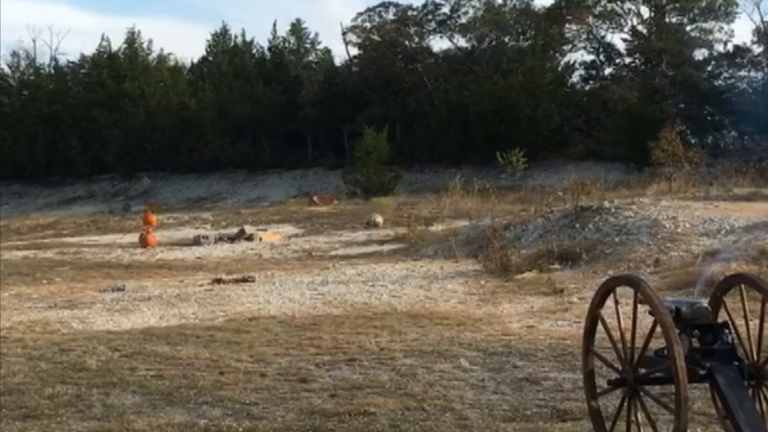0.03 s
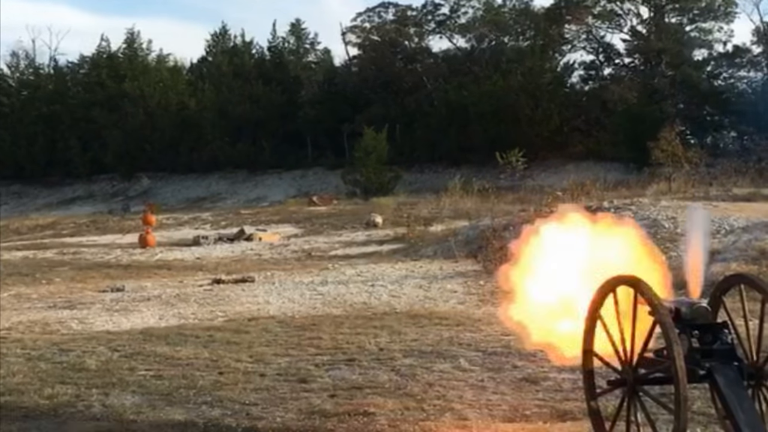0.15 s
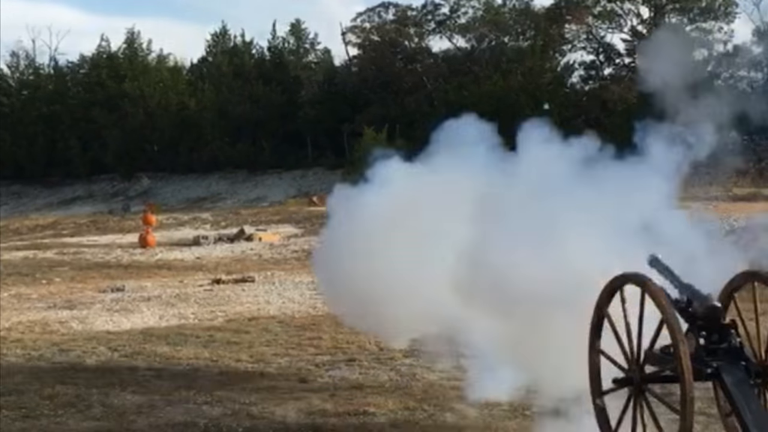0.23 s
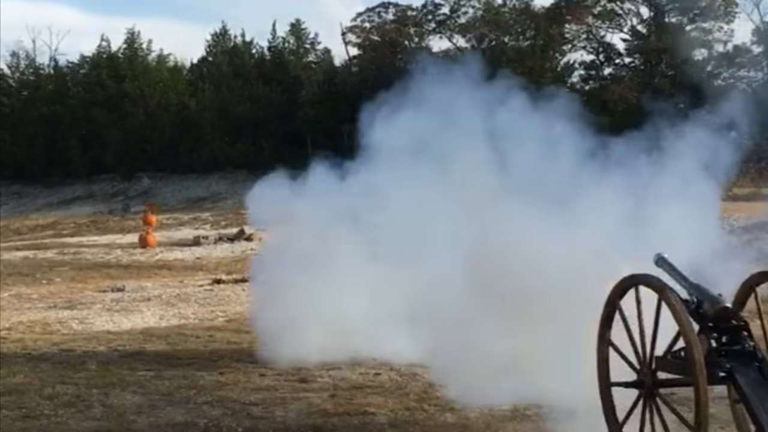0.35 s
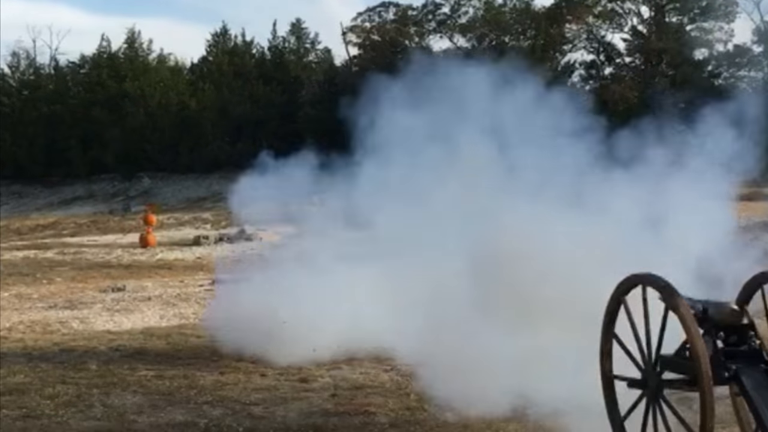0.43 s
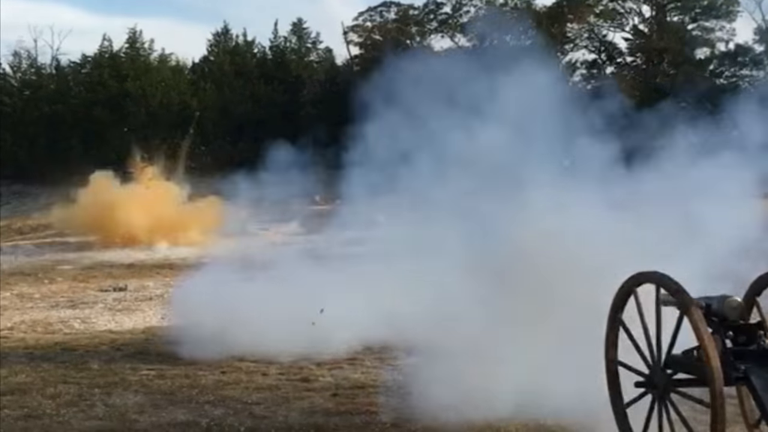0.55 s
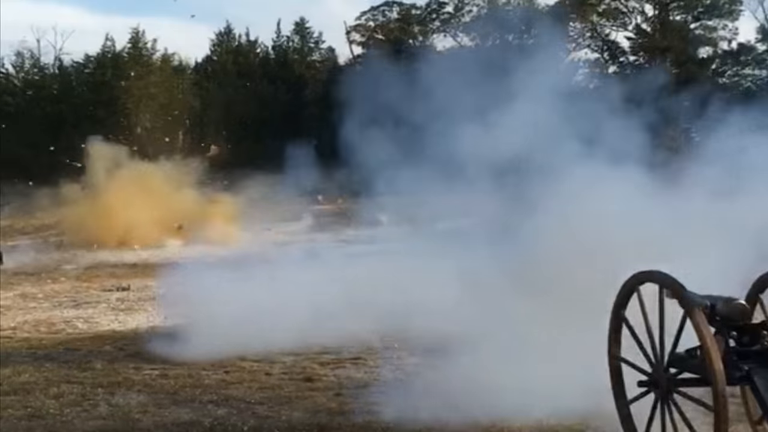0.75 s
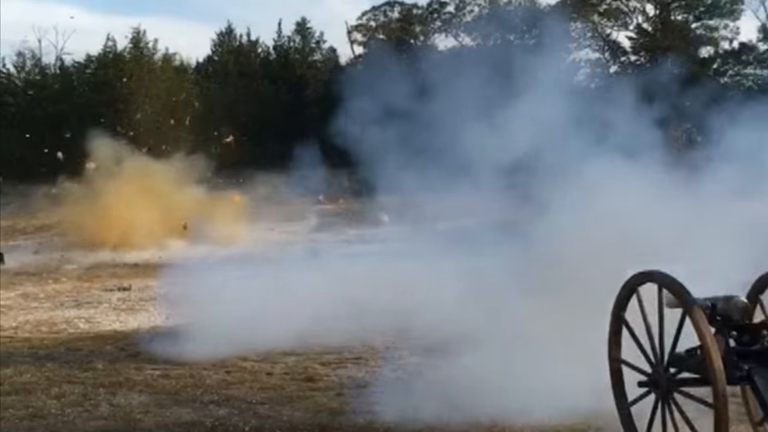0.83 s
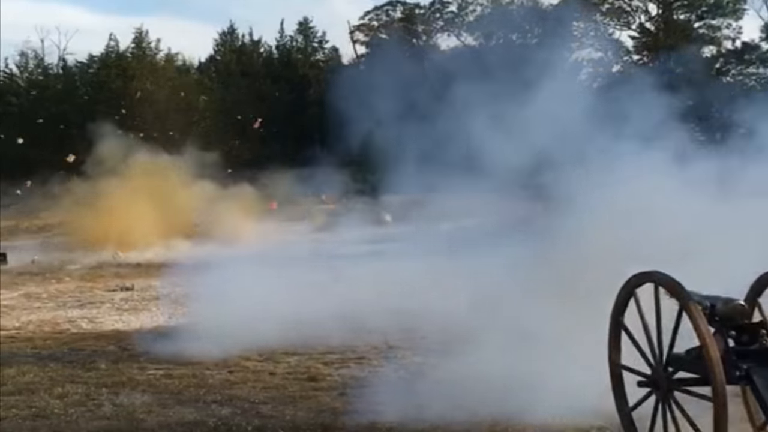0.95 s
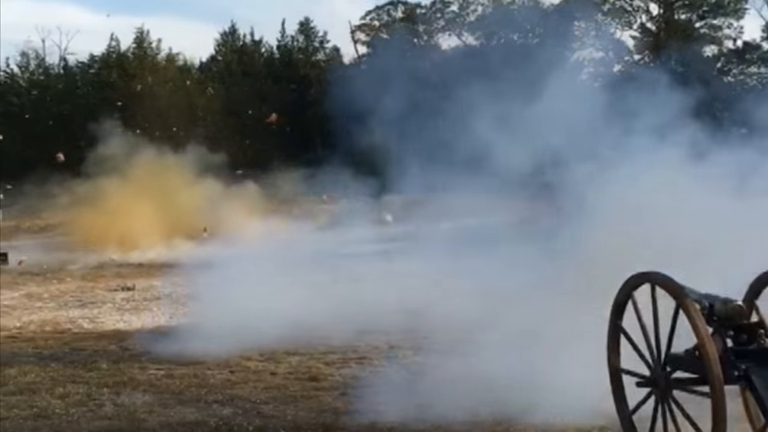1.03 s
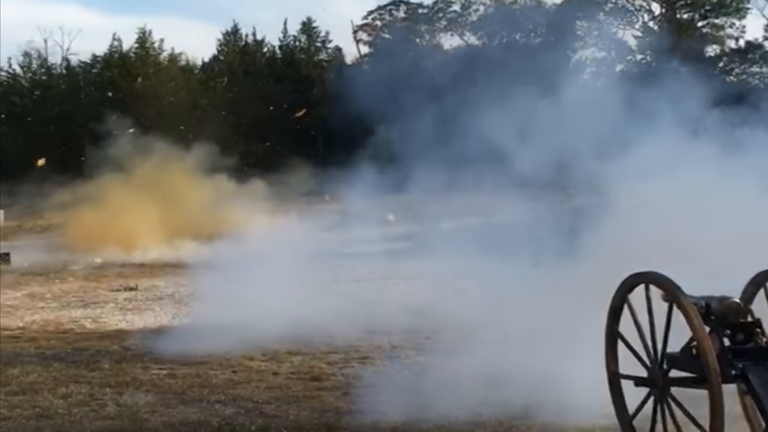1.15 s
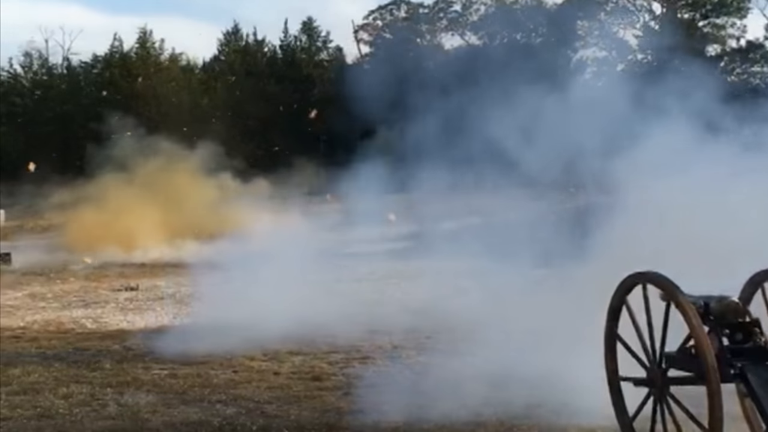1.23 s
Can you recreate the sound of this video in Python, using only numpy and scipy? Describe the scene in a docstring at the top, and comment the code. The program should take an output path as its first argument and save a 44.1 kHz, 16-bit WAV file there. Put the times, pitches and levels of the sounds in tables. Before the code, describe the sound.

A cannon goes off close by after a tiny priming spit, a hard crackling boom with a gas rasp, then a cluster of loud bursts downrange and rolling echo from the woods, overloading the outdoor microphone.

```python
"""A muzzle-loading cannon fires across an open field edged with trees.
Priming spits (shaped noise), then the muzzle blasts: N-shaped fronts with crackle, roaring noise, a deep sine boom.
Gas rasps on as the roar dies; a soft recoil knock follows, then more bursts as the shot strikes downrange.
Woods and land return a long, dulling noise echo and a low rumble, over light wind and faint hiss.
The microphone overloads; a limiter holds the peaks down."""
import sys
import numpy as np
from scipy import signal
from scipy.io import wavfile
from scipy.ndimage import uniform_filter1d, minimum_filter1d

SR = 44100
rng = np.random.default_rng(int(sys.argv[2]) if len(sys.argv) > 2 else 0)


def int16_out(signal):
    """Quantize to a 16-bit WAV file."""
    q = np.round(np.clip(np.atleast_2d(signal).T, -1, 1) * 32767)
    wavfile.write(sys.argv[1], SR, q.astype(np.int16))


N = 57330
TIME_S = np.arange(N) / SR

# Spectrum tables give relative density; noise() sets the total power.
# shock fronts and reflections: onset t/s, front level/dB, front length/s,
# crackle level/dB, crackle hold/s, crackle top f/Hz
SHOCK_FRONTS = [(0.2441, -14, 0.0022, 2, 0.002, 17300), (.2500, -14, 0.0004, -11, 0.0067, 16100),
                (0.2568, -1, .0035, -22, 0.0016, 5000), (0.5267, -1, 0.000814, -9.5, 0.00067, 16000),
                (.5295, -13.5, 0.0024, -21.5, 0.0035, 8000), (0.5336, -4, 0.00073, -30, 0.0012, 9000),
                (0.5765, 0, 0.00115, -7, 0.002, 13700), (0.6048, -3, 0.0011, -13.5, 0.0028, 16000),
                (.6100, -9, 0.0014, -31, 0.0014, 4000), (0.6213, -18, 0.00072, -17.5, .004, 3600),
                (0.6744, -28, 0.00023, -7, 0.0036, 10400), (.6820, -17, 0.00074, -9, 0.00095, 14800),
                (0.7053, 4.5, 0.00262, -5.5, .002, 4000), (0.7106, -7, 0.003, -19, 0.0004, 11100)]
# crackle spectrum: f/Hz, level/dB per Hz
CRACKLE_SPECTRUM = [(100, -1), (700, 14.5), (2000, 3.5), (4000, 3.5), (8000, -2.5), (12000, -3.5),
                    (16000, -6.5)]
# brief ring of the fronts: f/Hz, width/Hz, level/dB
FRONT_RINGS = [(417, 60, -18), (970, 140, -2)]
# pressure swings of the big blasts and strongest returns: onset t/s, level/dB, f/Hz, hold/s, fall/(dB/s)
BOOM_SWINGS = [(.251, -10.5, 64, 0.05, 492), (0.573, -9, 69.5, 0.035, 901), (.678, -5, 66.9, 0.052, 323),
               (.703, -9, 141.8, 0.021, 450), (0.791, -9, 104, 0.0096, 900), (0.817, -19, 66, 0.04, 400)]
# roar of each blast and burst: onset t/s, level/dB, hold/s, fall/(dB/s), brightness/(dB/octave)
ROAR_EVENTS = [(0.239, -13.5, 0.043, 420, .8), (0.52, -20.5, 0.025, 396, 0.15),
               (0.574, -13.5, 0.015, 520, 0), (0.5988, -13.5, 0.024, 476.5, 0.53),
               (0.672, -11.5, 0.057, 286, -1.0)]
# roar spectrum: f/Hz, level/dB per Hz
ROAR_SPECTRUM = [(30, 11), (170, 14), (260, 3), (420, -3), (600, 1.5), (780, -4), (1050, 2), (1600, -3.5),
                 (2250, -1), (2900, -11), (3700, -7), (4800, -16), (6500, -13.5), (10000, -21),
                 (15500, -29.5)]
# last rasp of gas: t/s, level/dB
RASP_LEVEL = [(.268, -35), (.282, -16), (.305, -20), (.325, -31), (.352, -39), (.375, -50), (.45, -120)]
# rasp spectrum: f/Hz, level/dB per Hz
RASP_SPECTRUM = [(400, -10), (1000, 0), (1600, -1.5), (2250, 0.5), (3000, -2), (4700, -13.5), (6100, -9),
                 (9000, -16.5), (15000, -31)]
# priming spit: t/s, level/dB
PRIMING_LEVEL = [(.221, -63), (.226, -22), (.229, -26), (.235, -30.5), (.240, -9), (.246, -16), (.255, -68),
                 (.28, -120)]
# priming spectrum: f/Hz, level/dB per Hz
PRIMING_SPECTRUM = [(60, -6.5), (170, -5.5), (290, -17.5), (430, 5.5), (600, -16), (950, -2.5), (1300, -26),
                    (1900, -16), (4000, -27), (9000, -27), (16000, -34)]
# knock spectrum: f/Hz, level/dB per Hz
KNOCK_SPECTRUM = [(100, 7), (300, 1.5), (600, -11), (1400, -10), (2000, 5), (3000, -11), (5000, -13),
                  (12000, -32)]
# reflections from nearby ground and gun carriage: delay t/s, level/dB
NEAR_ECHOES = [(.0074, -14.5), (0.0168, -22)]
# echo from the trees: t/s, level/dB
TREE_ECHO_LEVEL = [(.25, -68), (.33, -50), (.37, -43.5), (.40, -40.5), (.44, -42), (.49, -32.5), (.56, -33),
                   (.66, -32), (.74, -25), (.82, -25.5), (.895, -26), (.94, -28), (.967, -26.5),
                   (.995, -30.5), (1.10, -29), (1.15, -33.5), (1.21, -35.5), (1.30, -38.5)]
# tree echo spectrum before dulling: f/Hz, level/dB per Hz
TREE_ECHO_SPECTRUM = [(100, 3.5), (180, -6.5), (290, 4), (400, -8), (560, -4.5), (750, 1), (1100, 1),
                      (1600, 0), (2200, -1), (2900, -5.5), (3700, -4), (5000, -11), (6500, -11),
                      (10000, -24.5), (13000, -34), (16000, -47)]
# rumble rolling back from the land: t/s, level/dB
RUMBLE_LEVEL = [(.25, -66), (.345, -56), (.37, -48), (.45, -61), (.49, -31.5), (.56, -48), (.665, -34),
                (.715, -15.5), (.77, -19), (.82, -14.5), (.89, -28), (1.06, -30.5), (1.16, -34.5),
                (1.30, -41)]
# rumble spectrum: f/Hz, level/dB per Hz
RUMBLE_SPECTRUM = [(25, -31), (45, -8), (70, 2.5), (108, 9), (155, -5), (210, -23), (400, -51),
                   (1000, -98.5)]
# wind on the microphone: f/Hz, level/dB per Hz
WIND_SPECTRUM = [(22, -1.5), (45, -10), (65, 13), (95, 3), (140, -3.5), (220, -20.5), (400, -27),
                 (600, -72), (2000, -74)]
# faint hiss: f/Hz, level/dB per Hz
HISS_SPECTRUM = [(300, -14), (1100, -0.5), (2000, -3.5), (5000, -4.5), (6800, 2), (9000, -3.5), (12500, -4),
                 (15000, -31)]

FRONT_EDGE_HZ, GROUND_LAG_S, GROUND_DB = 1860, 0.001, -13
CRACKLE_ATTACK_S, ROAR_ATTACK_S = 0.0004, 0.00067
BOOM_ATTACK_S, BOOM_ROUGH_RAD = 0.012, 0.28
KNOCK_S, KNOCK_DB, KNOCK_ATTACK_S, KNOCK_FALL_DB_PER_S = 0.3935, -25.5, 0.0015, 1300
DULLING_FROM_S, DULLING_DB_PER_KHZ_S = 0.79, 7.5
WIND_DB, HISS_DB, HISS_END_S, HISS_FALL_DB_PER_S = -40, -58.5, 0.6, 87
OVERLOAD_TOP = 1.0  # full scale
LIMIT_DB, LIMITER_AHEAD_S, LIMITER_RELEASE_DB_PER_S = -4, 0.00096, 899
CUTOFF_HZ = 15900


def from_db(db):
    """Decibels to gain."""
    return 10 ** (np.asarray(db) / 20)


def curve(rows):
    """Gain along a table of t/s, level/dB; silent before its first row."""
    t_s, level_db = np.transpose(rows)
    return from_db(np.interp(TIME_S, t_s, level_db)) * (TIME_S >= t_s[0])


def envelope(start_s, attack_s, hold_s, fall_db_per_s):
    """Linear attack, then a steady dB fall; the hold counts from the start."""
    age_s = TIME_S - start_s
    attack = np.clip(age_s / attack_s, 0, 1)
    return attack * from_db(-abs(fall_db_per_s) * np.maximum(age_s - hold_s, 0))


def noise(spectrum, tilt_db_per_octave=0, dulling_db_per_khz=0):
    """Third-octave noise bands with a total rms of 1 before dulling."""
    edges_hz = np.geomspace(20, 18000, 30)
    points_hz, points_db = np.transpose(spectrum)
    white = rng.standard_normal((2, N + SR // 4))  # extra lead lets the filters settle
    out, power = 0, 0
    for k, (low_hz, high_hz) in enumerate(zip(edges_hz, edges_hz[1:])):
        centre_hz = np.sqrt(low_hz * high_hz)
        sos = signal.butter(2, [low_hz, high_hz], "band", fs=SR, output="sos")
        band = signal.sosfilt(sos, white[k % 2])[-N:]  # neighbours use separate noises
        density_db = np.interp(np.log(centre_hz), np.log(points_hz), points_db)
        density_db += tilt_db_per_octave * np.log2(centre_hz)
        gain = from_db(density_db) * np.sqrt(high_hz - low_hz)
        dulling = from_db(-dulling_db_per_khz * centre_hz / 1000)
        out = out + gain * band / band.std() * dulling
        power += gain ** 2
    return out / np.sqrt(power)


def steady(x, window_s):
    """Evens out the slow chance swells of a noise."""
    size = max(int(window_s * SR), 2)
    mean_square = uniform_filter1d(uniform_filter1d(x ** 2, size), size)
    return x / np.sqrt(mean_square + 1e-12)


def flutter(rate_hz):
    """Random wavering: unit-spread knots joined by straight lines."""
    knots = rng.standard_normal(N)
    return np.interp(TIME_S * rate_hz, np.arange(N), knots)


def low_pass(x, hz, order=2):
    """Butterworth low-pass."""
    sos = signal.butter(order, min(hz, SR / 2 - 1), fs=SR, output="sos")
    return signal.sosfilt(sos, x + 1e-18)


def resonance(x, hz, width_hz):
    """Two-pole resonance with a peak gain of 1."""
    radius = np.exp(-np.pi * width_hz / SR)
    zeros = (1 - radius ** 2) / 2 * np.array([1, 0, -1])
    poles = [1, -2 * radius * np.cos(2 * np.pi * hz / SR), radius ** 2]
    return signal.lfilter(zeros, poles, x + 1e-18)


def shocks(crackle_fall_db_per_s):
    """N-shaped pressure fronts with ground bounce and brief ring, each trailed by a short crackle."""
    fronts, crackle = 0, 0
    spray = steady(noise(CRACKLE_SPECTRUM), window_s=0.0037)
    for start_s, front_db, length_s, crackle_db, hold_s, top_hz in SHOCK_FRONTS:
        progress = (TIME_S - start_s) / length_s
        inside = (progress >= 0) & (progress < 1)
        fronts = fronts + from_db(front_db) * (1 - 2 * progress) * inside
        burst = envelope(start_s, CRACKLE_ATTACK_S, hold_s, crackle_fall_db_per_s)
        crackle = crackle + from_db(crackle_db) * burst * low_pass(spray, top_hz)
    fronts = low_pass(fronts, FRONT_EDGE_HZ)
    bounce = from_db(GROUND_DB) * np.interp(TIME_S - GROUND_LAG_S, TIME_S, fronts)
    ring = sum(from_db(db) * resonance(fronts, hz, width_hz) for hz, width_hz, db in FRONT_RINGS)
    return fronts + bounce + ring + crackle


def booms():
    """The air swings a few uneven times, suction first."""
    out = 0
    for start_s, level_db, hz, hold_s, fall_db_per_s in BOOM_SWINGS:
        phase_rad = 2 * np.pi * hz * (TIME_S - start_s) + BOOM_ROUGH_RAD * flutter(rate_hz=160)
        level = from_db(level_db) * envelope(start_s, BOOM_ATTACK_S, hold_s, fall_db_per_s)
        out = out - level * np.sin(phase_rad)
    return out


def roars(ragged_db):
    """Turbulent gas after each blast holds briefly, then falls away raggedly."""
    gas = 0
    for start_s, level_db, hold_s, fall_db_per_s, tilt_db_per_octave in ROAR_EVENTS:
        level = from_db(level_db) * envelope(start_s, ROAR_ATTACK_S, hold_s, fall_db_per_s)
        gas = gas + level * steady(noise(ROAR_SPECTRUM, tilt_db_per_octave), window_s=0.015)
    return gas * from_db(ragged_db * flutter(rate_hz=350))


def rasp():
    """Gas still leaving the muzzle rasps on after the main roar."""
    return curve(RASP_LEVEL) * noise(RASP_SPECTRUM)


def priming():
    """A swelling spit of flame from the vent."""
    return curve(PRIMING_LEVEL) * steady(noise(PRIMING_SPECTRUM), window_s=0.013)


def knock():
    """The recoiling gun gives a short, soft knock between the blasts."""
    shape = envelope(KNOCK_S, KNOCK_ATTACK_S, KNOCK_ATTACK_S, KNOCK_FALL_DB_PER_S)
    return from_db(KNOCK_DB) * shape * noise(KNOCK_SPECTRUM)


def near_reflections(x):
    """Close surfaces repeat the sound and comb its spectrum."""
    return x + sum(from_db(db) * np.interp(TIME_S - lag_s, TIME_S, x, left=0) for lag_s, db in NEAR_ECHOES)


def tree_echo(ragged_db):
    """Countless reflections from the woods; later ones have crossed more air and are duller."""
    dulling_db_per_khz = DULLING_DB_PER_KHZ_S * np.maximum(TIME_S - DULLING_FROM_S, 0)
    echo = curve(TREE_ECHO_LEVEL) * noise(TREE_ECHO_SPECTRUM, dulling_db_per_khz=dulling_db_per_khz)
    return echo * from_db(ragged_db * flutter(rate_hz=120))


def rumble():
    """The booms roll back from the surrounding land as low noise."""
    return curve(RUMBLE_LEVEL) * steady(noise(RUMBLE_SPECTRUM), window_s=0.078)


def background():
    """Wind on the microphone, and a faint hiss that fades under the echo."""
    wind = from_db(WIND_DB) * steady(noise(WIND_SPECTRUM), window_s=0.23)
    hiss_level = from_db(HISS_DB) * envelope(0, 1 / SR, HISS_END_S, HISS_FALL_DB_PER_S)
    return wind + hiss_level * noise(HISS_SPECTRUM)


def scene():
    """The shot, its bursts and their echo at one microphone."""
    blasts = shocks(crackle_fall_db_per_s=5999) + booms() + rasp() + priming()
    wash = near_reflections(roars(ragged_db=1.9) + tree_echo(ragged_db=1.33))
    return (blasts + wash + knock() + rumble() + background())[None]


def limiter(x):
    """The gain ducks just ahead of each peak and recovers quickly."""
    over_db = np.maximum(20 * np.log10(abs(x) + 1e-9) - LIMIT_DB, 0)
    recovery_db = LIMITER_RELEASE_DB_PER_S * TIME_S
    duck_db = np.maximum.accumulate(over_db + recovery_db, axis=-1) - recovery_db
    size = max(int(2 * LIMITER_AHEAD_S * SR), 2)
    gain_db = uniform_filter1d(minimum_filter1d(-duck_db, size), size)
    return x * from_db(gain_db)


def record(dry):
    """The overloaded microphone rounds off peaks, a limiter holds them down, and the top is cut."""
    rounded = dry / (1 + (dry / OVERLOAD_TOP) ** 4) ** (1 / 4)
    # order 10, 0.1 dB ripple, 80 dB stopband
    top_cut = signal.ellip(10, 0.1, 80, CUTOFF_HZ, fs=SR, output="sos")
    return signal.sosfilt(top_cut, limiter(rounded))


dry = scene()
out = record(dry)
int16_out(out)
```